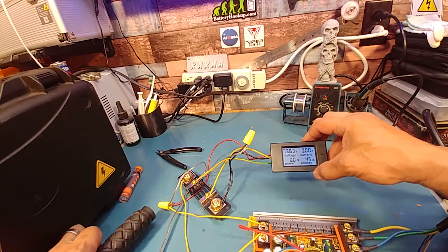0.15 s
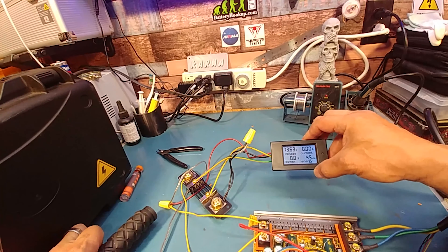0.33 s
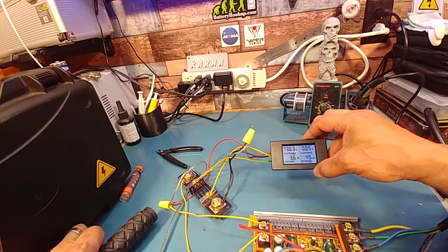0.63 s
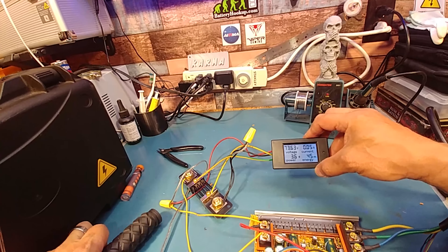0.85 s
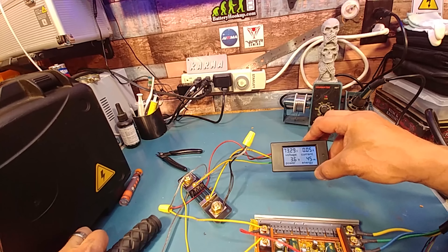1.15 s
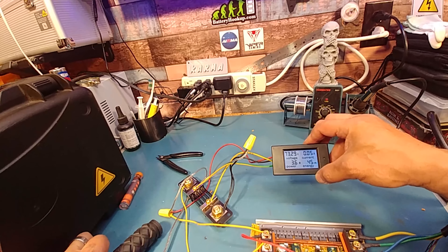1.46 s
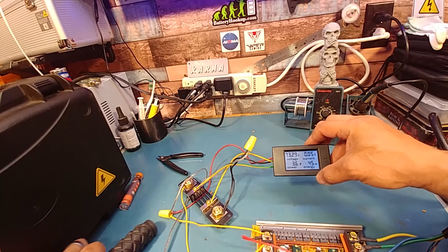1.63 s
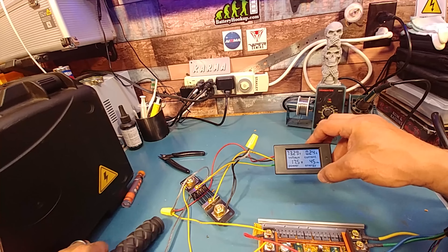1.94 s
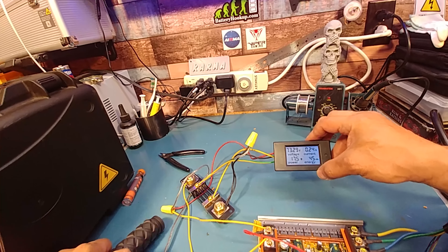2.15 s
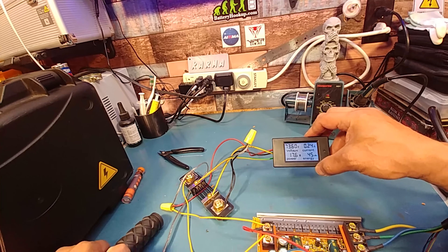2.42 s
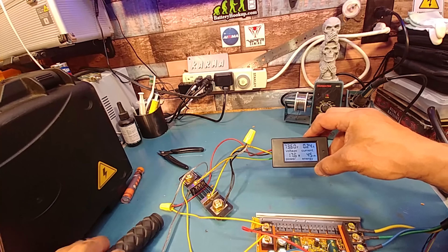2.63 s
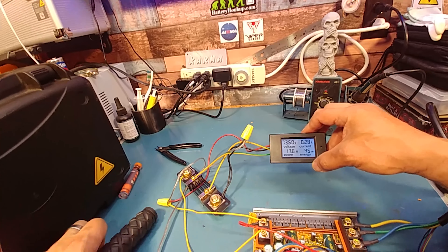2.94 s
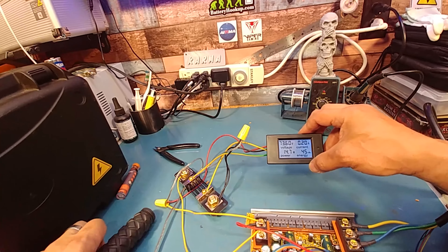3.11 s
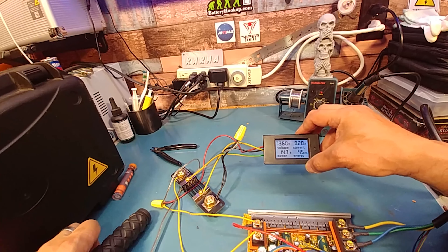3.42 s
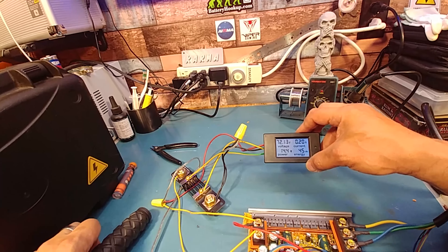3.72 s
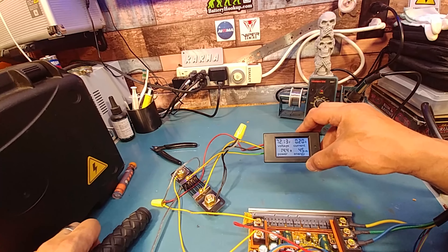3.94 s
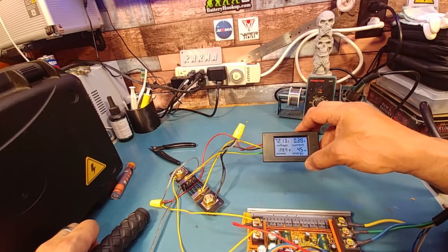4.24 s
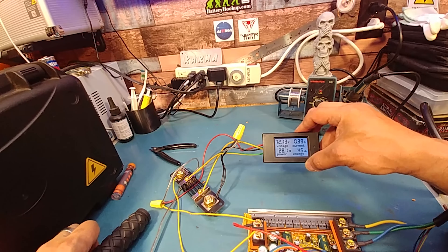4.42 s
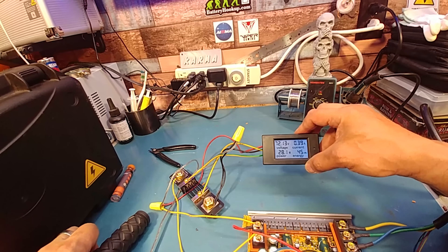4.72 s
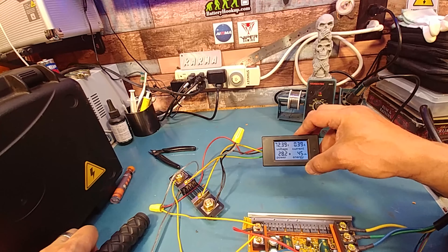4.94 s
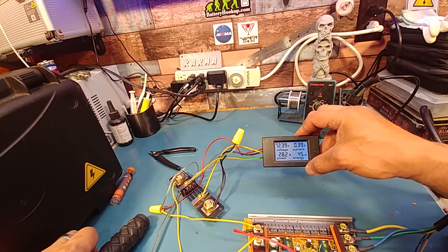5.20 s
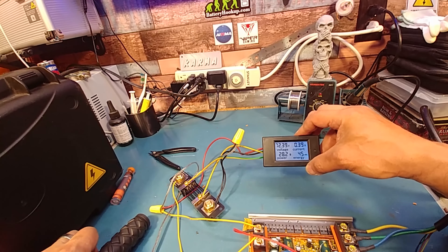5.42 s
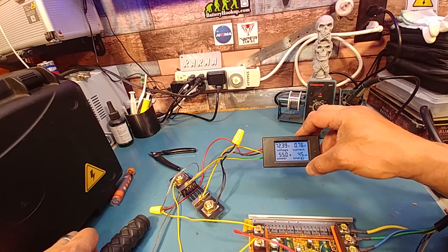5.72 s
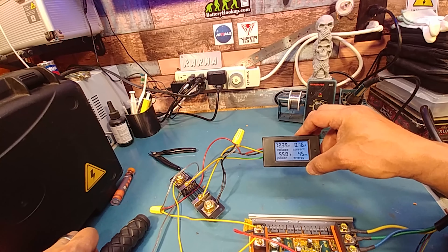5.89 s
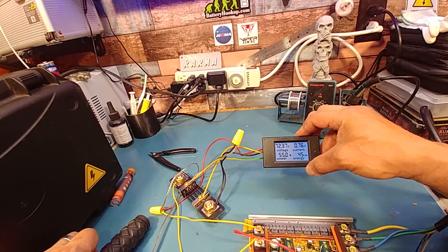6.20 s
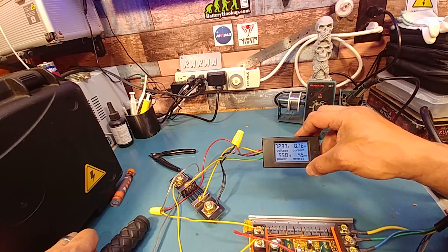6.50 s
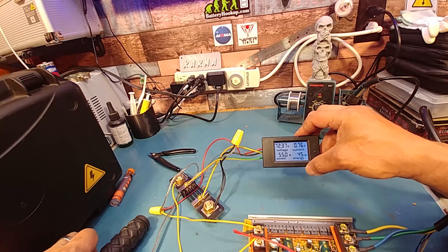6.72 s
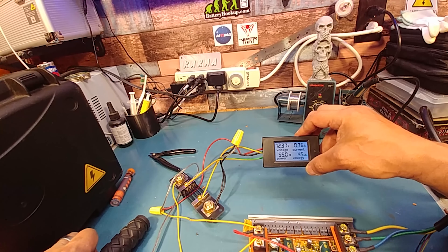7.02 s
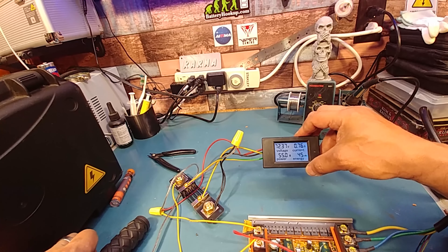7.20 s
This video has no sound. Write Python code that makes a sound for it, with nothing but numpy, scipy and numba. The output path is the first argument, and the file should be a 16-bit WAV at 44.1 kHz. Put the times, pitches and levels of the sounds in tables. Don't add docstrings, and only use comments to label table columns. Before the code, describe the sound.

On a workbench in a small room, a switch clicks and an electric motor whines up, holds briefly, bursts faster with a bench-shaking hum, then coasts down with a low thud and small knocks. A second click sends it quickly to full speed: heavy low drone, rattling parts, hissing bearings and a shrill whine, steady to the end. Very close stereo microphones, slightly overloaded.

```python
import sys
import numpy as np
from scipy import signal
from scipy.fft import rfft, irfft, next_fast_len
from scipy.io import wavfile
from numba import njit

SR = 44100
rng = np.random.default_rng(int(sys.argv[2]) if len(sys.argv) > 2 else 0)


def generate_wav(sig):
    pcm = np.round(np.clip(np.atleast_2d(sig).T, -1, 1) * 32767).astype(np.int16)
    wavfile.write(sys.argv[1], SR, pcm)


def boost_factor(decibels):
    exponent = np.asarray(decibels, float) / 20
    return 10 ** exponent


N = 324135
STEP = 64
BENCH_LAG_S = 0.029
JUMP_TURNS = 69.5

# f/Hz, left over right/dB
LEAN = [(60, 7.5), (110, -2), (200, 4.5), (380, 3.5), (700, -1.5), (1290, 1.5), (2380, -0.5), (4400, -3.0),
        (8120, 0), (15000, 5.5)]
# f/Hz, density/dB
THRUM = [(100, -80), (220, -35), (320, 14), (390, 4), (460, 7), (650, -39), (1500, -100)]


def unit(x):
    return x / np.sqrt(np.mean(x ** 2) + 1e-20)


def at_hz(points, hz):
    points = np.array(points)
    return np.interp(np.log(np.maximum(hz, 1)), np.log(points[:, 0]), points[:, 1])


def together(*db):
    return 10 * np.log10(sum(boost_factor(2 * d) for d in db) + 1e-12)


def smooth(control):
    return np.interp(np.arange(N) / STEP, np.arange(len(control)), control)


def drift(rate_hz):
    r = np.exp(-2 * np.pi * STEP * rate_hz / SR)
    chance = rng.standard_normal(N // STEP + 2002)
    return unit(signal.lfilter([1], [1, -2 * r, r * r], chance)[2000:])


def noise(spectrum):
    # f/Hz, correlation
    likeness = [(60, 0.99), (130, 0.74), (290, 1), (640, -0.22), (1410, -0.2), (3100, -0.24),
                (6820, -0.073), (15000, -0.024)]
    size = next_fast_len(N)
    hz = np.fft.rfftfreq(size, 1 / SR)
    mid, side = rfft(rng.standard_normal((2, size))) * boost_factor(at_hz(spectrum, hz)) * (hz > 15)
    alike = np.clip(at_hz(likeness, hz), -.99, .99)
    lean = boost_factor(at_hz(LEAN, hz) / 2)
    mid, side = np.sqrt(1 + alike) * mid, np.sqrt(1 - alike) * side
    left_right = np.array([(mid + side) * lean, (mid - side) / lean])
    return unit(irfft(left_right, size)[:, :N])


@njit
def add(out, angle, left, right, lag, step):
    for i in range((len(angle) - 1) // step + 1):
        if max(left[i], right[i], left[i + 1]) < 6e-5:
            continue
        for n in range(i * step, min(i * step + step, len(angle))):
            part = (n - i * step) / step
            late = lag[i] + part * (lag[i + 1] - lag[i])
            out[0, n] += (left[i] + part * (left[i + 1] - left[i])) * np.sin(angle[n] - late)
            out[1, n] += (right[i] + part * (right[i + 1] - right[i])) * np.sin(angle[n])


def tone(angle, hz, level_db, lean_db):
    # f/Hz, delay/ms
    path = [(120, .33), (600, .28), (2400, .11), (2900, .1), (3300, .05), (6000, .035), (15700, .015)]
    out = np.zeros((2, N))
    lag = 2 * np.pi * hz * at_hz(path, hz) / 1000
    peak_db = level_db + 3 + np.zeros_like(hz)
    left, right = boost_factor(peak_db + lean_db / 2), boost_factor(peak_db - lean_db / 2)
    add(out, angle + rng.uniform(0, 2 * np.pi), left, right, lag, STEP)
    return out


def shaft(t):
    # t/s, aim/turns per s, easing/s, softness of the start
    throttle = [
        (.546, 48, .243, 1.518),
        (.77, 36.24, .198, .847),
        (1.458, 66.04, .133, 1.486),
        (1.587, 70.72, .171, .832),
        (2.143, -10.4, .608, 1.21),
        (3.2, .5, .01, 1),
        (3.31, 165.6, .5, 1.691),
        (3.799, 119.37, .048, .804),
    ]
    speed = np.zeros_like(t)
    for s, aim, ease_s, soft in throttle:
        was = np.interp(s, t, speed)
        eased = aim + (was - aim) * np.exp(-(np.maximum(t - s, 0) / ease_s) ** soft)
        speed = np.where(t > s, eased, speed)
    return np.maximum(speed, .5)


def controls(t, speed):
    # t/s, level/dB
    effort = [
        [(.59, -47.5), (.68, -34), (.715, -32.5), (.746, -20), (.8, -30.5), (1.45, -30.5), (1.568, -22.5),
         (1.79, -29.5), (2.19, -29.5)],
        [(3.33, -52), (3.364, -49), (3.458, -32), (3.562, -15.5), (3.62, -23.5), (3.7, -22.5), (3.78, -17),
         (3.85, -24), (7.35, -25)],
    ]
    # f/Hz, level/dB
    bench = [(20, -40), (45, -13.5), (50, -18.5), (57, -7), (66, -4.5), (76, -6.5), (85, -16), (93, -5.5)]
    # t/s, level/dB
    jolts = [(0, -42), (.09, -35), (.59, -29.5), (.796, -26.5), (1.6, -30), (2.27, -13.5), (2.4, -19.5),
             (2.52, -23), (2.64, -30), (2.8, -44), (3.1, -44.5), (3.37, -31), (3.57, -25), (3.72, -13.5)]
    shapes = [np.interp(t, *np.transpose(run)) for run in effort]
    gates = [-600 * np.maximum(run[0][0] - t, 0) - 160 * np.maximum(t - run[-1][0], 0) for run in effort]
    effort_db = together(*[e + g for e, g in zip(shapes, gates)])
    chop_db = together(*[-36.5 + 0.46 * (e + 28) + g for e, g in zip(shapes, gates)])

    moving_db = 20 * np.log10(np.clip((speed - .5) / 8, 1e-3, 1))
    heave_db = at_hz(bench, np.interp(t - BENCH_LAG_S, t, speed)) + moving_db

    rise_s, fall_s = 0.058, 0.1
    jolts_db = [db - 20 * np.maximum((s - t) / rise_s, (t - s) / fall_s) for s, db in jolts]
    rumble_db = together(-37 + moving_db - 0.017 * speed, *jolts_db)

    low_driven_db = effort_db - 10.5 + 0.4412 * (speed - 36)
    low_db = together(low_driven_db, -46.5 + .2 * speed + moving_db)

    steady_db = -31 + 11 * np.log2(speed / 119)
    surge_db = -43 + 2.9 * (effort_db + 21)
    jump_db = -37 - 1.5 * np.abs(np.interp(t - 0.097, t, speed) - JUMP_TURNS)
    rattle_db = together(steady_db, surge_db, jump_db)

    coast_db = -33.5 + 8 * np.log2(speed / 60) - 0.83 * np.maximum(29 - speed, 0)
    return heave_db, rumble_db, low_db, rattle_db, together(effort_db, coast_db), chop_db


def room():
    # f/Hz, density/dB
    still_air = [(20, -26), (40, -13), (70, -3.5), (160, -22.5), (310, -13), (450, -17.5), (650, -13.5),
                 (1060, -24), (2080, -33.5), (7000, -41.5), (9500, -49), (15700, -55)]
    return boost_factor(-46.5) * noise(still_air)


def rumble(rumble_db):
    # f/Hz, density/dB
    colour = [(15, -20), (30, -19), (50, -0.5), (68, 3), (90, -5.5), (140, -11), (220, -11), (400, -30),
              (900, -100)]
    return smooth(boost_factor(rumble_db + 2.5 * drift(1.7))) * noise(colour)


def ticks():
    # t/s, tick level/dB, knock level/dB, tick t60/s
    events = [
        (0.073, -56, -43.5, 0.046),
        (0.206, -60, -61, 0.05),
        (0.532, -28, -43.5, 0.096),
        (0.572, -35, -43, 0.034),
        (2.713, -50, -28, 0.05),
        (2.9, -60, -44, 0.049),
        (2.947, -51, -40, 0.029),
        (3.293, -31, -42.5, 0.11),
    ]
    out, age = np.zeros((2, N)), np.arange(SR // 4) / SR
    bright = noise([(1200, -40), (2100, 7.5), (3100, 21), (4500, 5), (9000, 2), (15000, -21)])
    dying_db = -60 * age / 0.063
    knock = boost_factor(11.0 + dying_db) * np.sin(2 * np.pi * 390 * age)
    knock += boost_factor(-5.5 + dying_db) * np.sin(2 * np.pi * 860 * age)
    for s, tick_db, knock_db, t60 in events:
        at = slice(int(s * SR), int(s * SR) + len(age))
        crack = boost_factor(tick_db + 1.5 - 60 * age / max(t60, .005)) * bright[:, at]
        out[:, at] += crack + boost_factor(knock_db) * knock
    return out


def chopper(turn, speed, level_db):
    # f/Hz, level/dB
    colour = [(2000, -70), (2500, 3), (4200, 8), (6300, -17), (7800, 8), (9300, -24), (10600, -30.5),
              (12800, -10), (14200, -10), (14900, -25), (15300, 7), (15650, -8.5)]
    chop_hz = 15650
    carrier, out = 2 * np.pi * chop_hz * np.arange(N) / SR, 0
    cluster_db = 26 * np.clip((speed - 105) / 10, 0, 1)
    for k in [0, 1, 2, 38, 40, 41] + list(range(3, 40, 3)) + list(range(42, 112, 6)):
        hz = chop_hz - k * speed
        if k % 6 == 0:
            order_db = 0
        elif k % 3 == 0:
            order_db = -2 - 0.068 * speed
        else:
            order_db = -15
        order_db = order_db + cluster_db * (37 < k < 42) - 0.16 * k
        side_db = level_db - 3 + at_hz(colour, hz) + order_db + 1.1 * drift(12)
        out = out + tone(carrier - k * turn, hz, side_db, 6.0 if k == 0 else at_hz(LEAN, hz))
    return out


def flare(hz):
    # f/Hz, width/Hz, gain/dB
    modes = [(400, 50, 6.5), (504, 33, -0.5), (825, 170, 5), (1254, 81, 7.5), (1620, 78, 12),
             (1800, 110, 8.5), (2280, 120, 8.5), (2450, 61, 6), (2992, 69, 9.5), (3190, 130, 4),
             (3900, 100, -1), (4110, 69, 6), (5210, 150, 10)]
    bed_db = -5
    return bed_db + sum(db / (1 + ((hz - centre) / width) ** 2) for centre, width, db in modes)


def whine(turn, speed, low_db, high_db, current):
    orders = [6, 12, 18, 24, 30, 36, 42, 45, 48, 54, 60, 66, 69, 72, 78, 81, 84, 90, 93, 96, 102, 108, 114,
              120]
    # level under current/dB, level coasting/dB
    slot_force = [(-13, -31), (-8, -11.5), (-1.5, -1.5), (1.5, -7), (-19, -5), (-10.5, 0), (2.5, -5),
                  (-10, -30), (-2, -6.5), (-13, -22), (3.5, -16.5), (-10, -28), (-11, -34), (-15, -17),
                  (-1.5, -38), (-28, -36.5), (-5.5, -32.5), (-8.5, -30), (-5, -37), (-23, -29), (-1, -32),
                  (-6.5, -20), (-4, -28), (-4, -19)]
    # f/Hz, level/dB
    housing = [(30, -18), (70, 16), (170, -9), (390, 4.5), (600, -2.5), (1300, -13.5), (1900, -19),
               (2200, -0.5), (2650, 12.5), (2900, 5), (3500, 10), (4200, 0), (5200, -8.5), (7000, -34),
               (9500, -29)]
    out = 0
    low_db = low_db + 4.5 - 0.25 * speed
    sweep = np.abs(np.gradient(speed)) * SR / STEP
    patchy_db = 1.5 + 4.5 * np.clip(sweep / 60, 0, 1)
    torque = current * np.clip(sweep / 110, 0, 1)
    for k, (driven_db, coast_db) in zip(orders, slot_force):
        hz = k * speed
        high = np.clip((hz - 1300) / 600, 0, 1)
        force_db = current * driven_db + (1 - current) * coast_db
        force_db = force_db - 6 * torque * (k > 39) * np.clip(k / 60, 0, 1)
        force_db = force_db + flare(hz) + patchy_db * drift(24)
        body_db = at_hz(housing, hz) + (1 - high) * low_db + high * (high_db - 13.0)
        out = out + tone(k * turn, hz, force_db + body_db, at_hz(LEAN, hz))
    return out


def heave_beat(turn, speed):
    return smooth(np.clip(speed / 60, 0, 1)) * (np.cos(turn - 1.2) + 1.37 * np.cos(2 * turn - .3))


def whirr(turn, speed, high_db, current):
    # f/Hz, density/dB
    driven_fast = [(880, -16), (1500, -5.5), (2300, -3), (2710, 1.5), (2800, -3), (2960, -3.5), (3160, -4),
                   (4000, -7.5), (4300, -4.5), (5440, -7), (7640, -10), (9510, -22), (10400, -31.5),
                   (13500, -54), (22000, -120)]
    # f/Hz, density/dB
    driven_slow = [(880, -40), (1500, -10), (1980, -36), (2380, -6), (3320, 4.5), (4740, -9.5), (5760, -11),
                   (6710, -57), (7770, -9), (8160, -9.5), (8990, -11.5), (10100, -38), (10400, -43),
                   (13500, -46), (22000, -120)]
    # f/Hz, density/dB
    coasting = [(880, -20), (1500, -1), (1840, -11), (2020, -5), (2270, -6), (2640, -13), (3290, 3.5),
                (3810, -0.5), (4230, -9), (5100, -2.5), (6610, -21.5), (8420, -18.5), (10400, -36),
                (13500, -59), (22000, -120)]
    fast = smooth(np.clip(speed / 110, 0, 1))
    driven = np.sqrt(fast) * noise(driven_fast) + np.sqrt(1 - fast) * noise(driven_slow)
    hiss = smooth(np.sqrt(current)) * driven + smooth(np.sqrt(1 - current)) * noise(coasting)
    level_db = high_db - 0.02 - 4.7 * np.clip(1 - speed / 110, 0, 1) + 0.83 * drift(31)
    return smooth(boost_factor(level_db)) * boost_factor(0.73 * heave_beat(turn, speed)) * hiss


def fizz(turn, speed, chop_db):
    # f/Hz, density/dB
    colour = [(5590, -49), (9500, -16), (10500, -31), (10800, -12), (11400, -16), (12300, -9), (13700, 1.5),
              (14900, -5), (15300, -19), (15800, -5.5)]
    fast = smooth(np.clip(speed / 110, 0, 1))
    swell_db = 0.7 * heave_beat(turn, speed) - 9.9 * (0.5 - fast)
    return smooth(boost_factor(chop_db - 5.5)) * boost_factor(swell_db) * noise(colour)


def thrum(speed, low_db):
    level_db = low_db - 6 - .5 * np.maximum(speed - 45, 0) + 2 * drift(15)
    return smooth(boost_factor(level_db)) * noise(THRUM)


def unbalance(turn, speed, level_db):
    orders = [.5, 2, 2.5, 3, 4, 5, 6, 7, 8, 9, 9.5, 10, 10.5, 11, 12, 12.5, 13, 14, 25, 32, 33, 37, 39]
    # level below the heave/dB, left over right/dB
    shake = [(-36, 0), (-22, -3), (-40, 31.5), (-19, -1.5), (-35.5, 15), (-18.5, -8.5), (-37.5, -18),
             (-60, -18), (-44, -25), (-32, -18), (-35.5, -3.5), (-29, 8), (-39.5, -14), (-37, -24.5),
             (-31.5, -18), (-49.5, -17.5), (-46.5, 25.5), (-42.5, -21), (-36.5, -5), (-38.5, 11),
             (-49.5, -33.5), (-37.5, -12), (-53, -9)]
    level_db = level_db + np.minimum(1.2 * (speed - 52), 0)
    slowing = np.minimum(np.gradient(speed), 0)
    settled = np.clip((JUMP_TURNS - speed) / 8 - 6 * slowing, 0, 1)
    slack = np.clip(1 - speed / 119, 0, 1)
    jumping = np.exp(-((speed - JUMP_TURNS) / 3) ** 2)
    out = tone(turn, speed, level_db, 1.86)
    for k, (db, lean_db) in zip(orders, shake):
        asleep_db = 29.0 * slack * (k > 5 or k % 1 > 0)
        asleep_db = asleep_db + (6 * jumping if k == 2 else 18 * settled)
        overtone_db = level_db + db + 0.28 * drift(9.6) - asleep_db
        out += tone(k * turn, k * speed, overtone_db, lean_db)
    return out


def rattle(turn, speed, rattle_db):
    # f/Hz, density/dB
    colour = [(40, -53), (100, 3.5), (200, -2.5), (330, -3.5), (500, 0.5), (900, 6), (1050, -3),
              (1400, -9.5), (1900, -3.5), (2400, -47), (5000, -100)]
    swell = boost_factor(3.77 * heave_beat(turn, speed))
    return smooth(boost_factor(rattle_db + 5.5 + 0.18 * drift(25))) * swell * noise(colour)


def growl():
    # t/s, level/dB, length/s
    swells = [
        (0.666, -31.5, 0.035),
        (0.757, -22, 0.021),
        (1.534, -38, .04),
        (2.264, -31.5, 0.095),
        (2.9, -44, .07),
        (3.51, -25.5, 0.043),
        (3.57, -21.5, 0.046),
    ]
    t = np.arange(N // STEP + 2) * STEP / SR
    level_db = together(*[db - 9 * ((t - s) / length) ** 2 for s, db, length in swells])
    return smooth(boost_factor(level_db + 3.9 * drift(27))) * noise(THRUM)


def snaps():
    # t/s, level/dB
    events = [
        (2.395, -62),
        (2.485, -54),
        (2.705, -65),
        (2.902, -44),
    ]
    out, age = np.zeros((2, N)), np.arange(SR // 8) / SR
    airy = noise([(3000, -25), (6000, -1), (9000, 0), (13000, -1), (15700, -9)])
    for s, db in events:
        at = slice(int(s * SR), int(s * SR) + len(age))
        out[:, at] += boost_factor(db - 60 * age / .06) * airy[:, at]
    return out


def scene():
    t = np.arange(N // STEP + 2) * STEP / SR
    speed = shaft(t)
    heave_db, rumble_db, low_db, rattle_db, high_db, chop_db = controls(t, speed)
    turn = 2 * np.pi * np.cumsum(smooth(speed)) / SR
    late = np.interp(t - BENCH_LAG_S, t, speed)
    late_turn = 2 * np.pi * np.cumsum(smooth(late)) / SR
    current = np.clip((chop_db + 51.5) / 14, 0, 1)

    mix = room() + rumble(rumble_db) + ticks()
    mix += chopper(turn, speed, chop_db - 30 * (1 - current))
    mix += whine(turn, speed, low_db, high_db, current)
    mix += whirr(turn, speed, high_db, current) + fizz(turn, speed, chop_db)
    mix += thrum(speed, low_db) + unbalance(late_turn, late, heave_db)
    mix += rattle(turn, speed, rattle_db) + growl() + snaps()
    return mix


def roll_off(x):
    return signal.sosfilt(signal.butter(12, 16210, fs=SR, output="sos"), x)


def record(dry):
    top_cut = signal.ellip(12, .5, 65, 15730, fs=SR, output="sos")
    cut = signal.sosfilt(top_cut, dry)
    return roll_off(np.clip(cut - .0033, -1, 1))


dry = scene()
out = record(dry)
generate_wav(out)
```